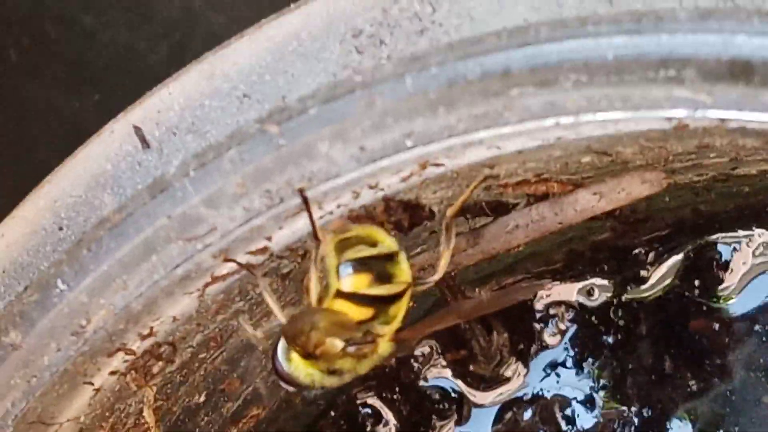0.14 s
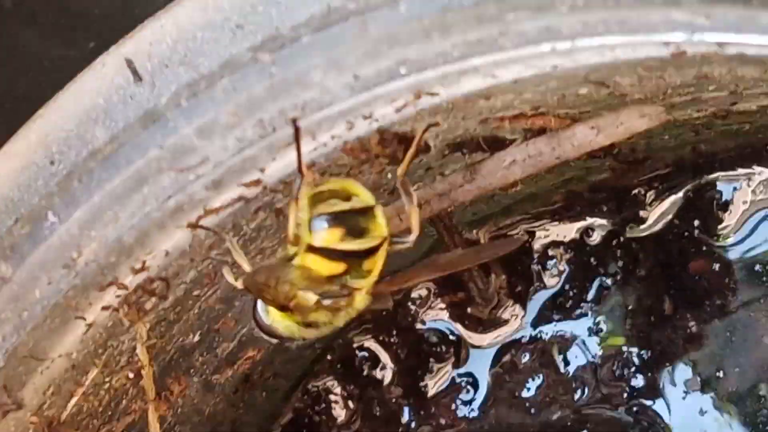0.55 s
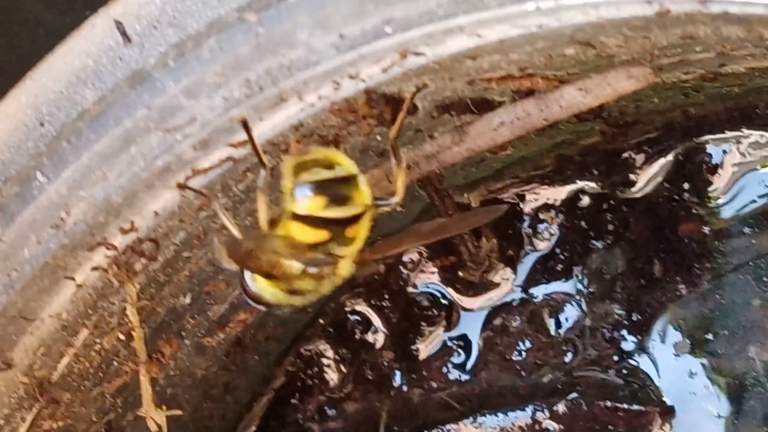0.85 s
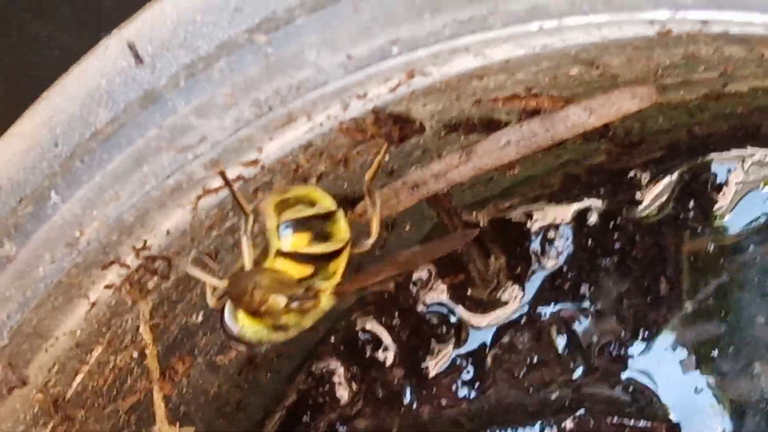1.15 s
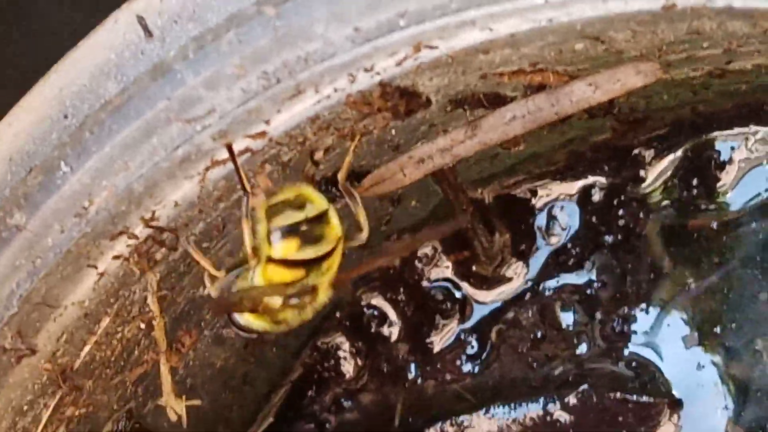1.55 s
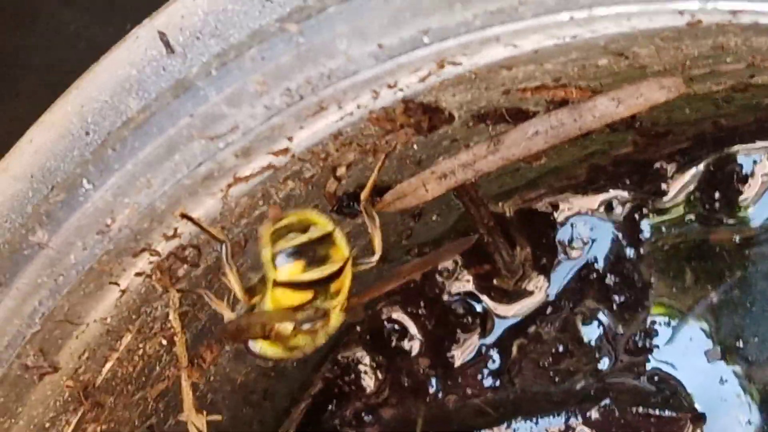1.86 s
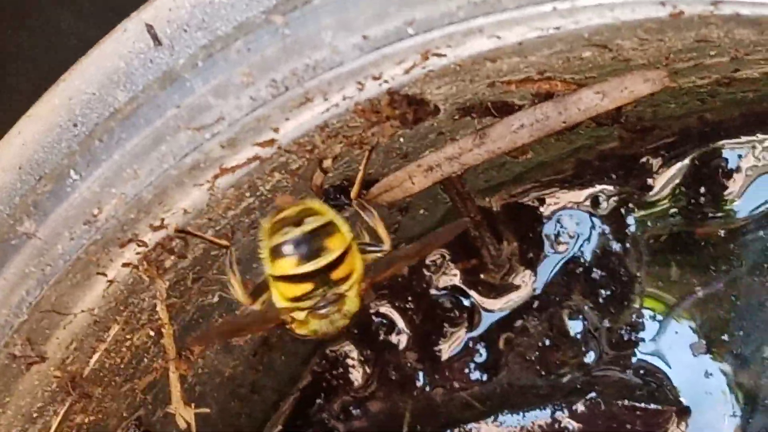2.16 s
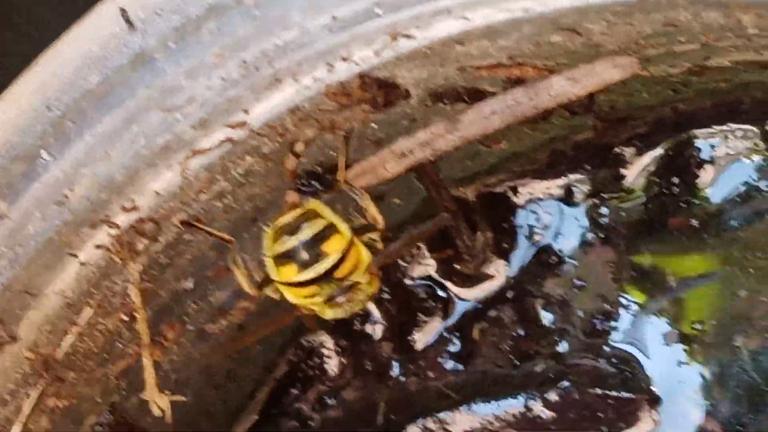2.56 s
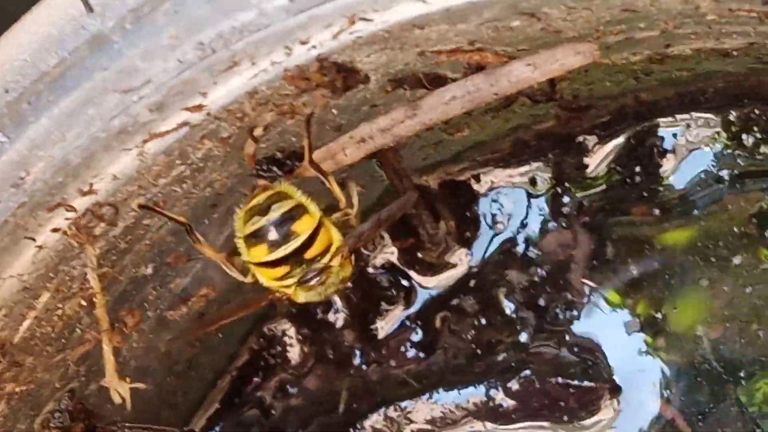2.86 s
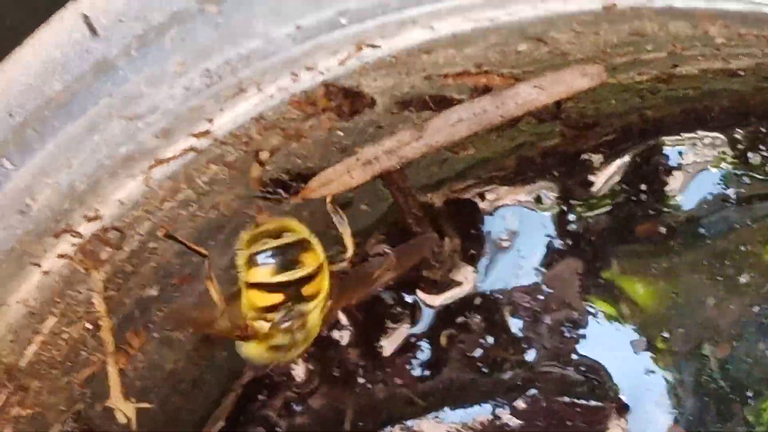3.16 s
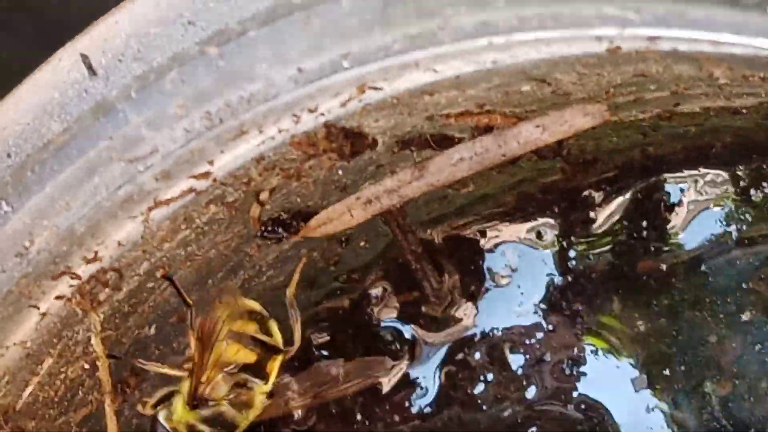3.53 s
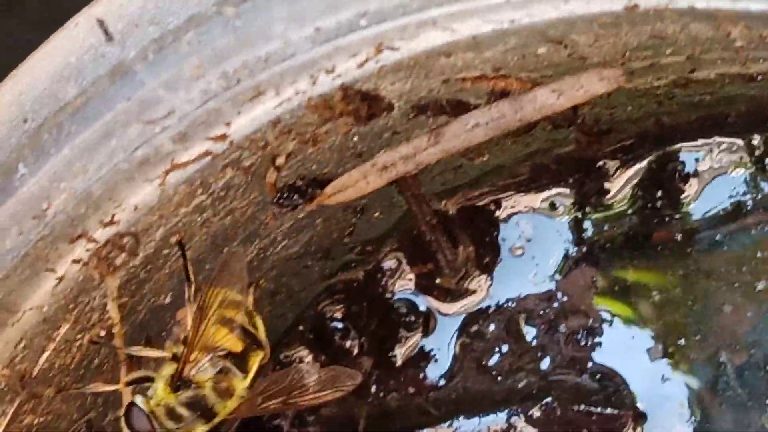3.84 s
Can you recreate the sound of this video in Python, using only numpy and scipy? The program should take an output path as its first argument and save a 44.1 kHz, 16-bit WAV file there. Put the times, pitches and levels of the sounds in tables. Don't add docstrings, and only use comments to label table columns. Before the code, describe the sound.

Electric tool some metres away kicks in late, its whine rising fast above faint traffic rumble

```python
import sys
import numpy as np
from scipy import signal
from scipy.fft import rfft, irfft, next_fast_len
from scipy.io import wavfile
from scipy.ndimage import uniform_filter1d

SR = 44100
rng = np.random.default_rng(int(sys.argv[2]) if len(sys.argv) > 2 else 0)


def to_linear_factor(level_db):
    exponent = np.asarray(level_db, float) / 20
    return 10 ** exponent


def bounce(signal):
    frames = np.transpose(np.atleast_2d(signal))
    limited = np.clip(frames, -1, 1)
    pcm = np.round(limited * 32767).astype(np.int16)
    wavfile.write(sys.argv[1], SR, pcm)


N = 176400

BARS, TOP_RATE_HZ = 24.8, 2810
START_S = 2.664
ALIKE_HZ = 350


def table(rows):
    return np.array(rows, float).T


def unit(x):
    return x / np.sqrt(np.mean(x ** 2))


def curve(points, hz):
    f, db = table(points)
    return np.interp(np.log(hz + 1), np.log(f), db)


def shape(x, gain):
    size = next_fast_len(N + 8192)
    f = np.arange(size // 2 + 1) * SR / size
    return irfft(rfft(x, size) * gain(f), size)[..., :N]


def ring(hz, centre_hz, width_hz):
    return 1j * hz * width_hz / (centre_hz ** 2 - hz ** 2 + 1j * hz * width_hz)


def ring_all(f, modes):
    return sum(to_linear_factor(db) * ring(f, hz, width) * (-1) ** k for k, (hz, width, db) in enumerate(modes))


def walk(rate):
    k = int(SR / rate)
    steps = np.repeat(rng.standard_normal(N // k + 1), k)
    return 1.21 * uniform_filter1d(uniform_filter1d(steps, k), k)[:N]


def wide(gain, alike_hz):
    f = np.arange(N // 2 + 1) * SR / N
    alike = 1 / (1 + (f / alike_hz) ** 2)
    re, im = rng.standard_normal((2, 2, len(f)))
    mid, side = irfft((re + 1j * im) * gain(f) * np.sqrt([1 + alike, 1 - alike]), N)
    return np.array([mid + side, mid - side])


def ringing_noise(hz, width_hz):
    return unit(wide(lambda f: ring(f, hz, width_hz) ** 2, ALIKE_HZ))


def bands(points, flicker_db, rate):
    out = 0
    for hz in 30 * 2. ** np.arange(10):
        def part(f):
            octaves_off = np.clip(np.log2((f + 1) / hz), -1, 1)
            return to_linear_factor(curve(points, f)) * np.cos(octaves_off * np.pi / 2)
        out = out + wide(part, ALIKE_HZ) * to_linear_factor(flicker_db * walk(rate))
    return unit(out)


def line_gain(f):
    # f/Hz, level/dB
    housing = [(740, 0), (830, -14), (960, -8), (1700, -11), (2750, -9), (3150, 0), (6700, 0), (7500, -12)]
    # f/Hz, width/Hz, level/dB
    lifts = [(188, 20, 16), (255, 60, 15), (345, 80, 9), (640, 190, 15), (950, 80, 7), (1900, 130, 16),
             (3300, 400, 4), (4720, 300, 7), (6150, 400, 6)]
    power = 1 + sum(np.abs(to_linear_factor(db) * ring(f, hz, width) ** 2) ** 2 for hz, width, db in lifts)
    return to_linear_factor(curve(housing, f)) * np.sqrt(power / (1 + (f / 7100) ** 24))


def motor_lines(rate, turn, on):
    # multiple of commutator rate, level/dB, growth with speed as a power
    whine = [(1, -61, 0), (2, -59, 0.5), (3, -59, 0.7), (4, -59, 1.4), (5, -57, 1.8), (6, -60, 2.2)]
    # multiple of shaft rate, level/dB at full speed, growth as a power
    shaft = [(1, -35, 3.8), (2, -49, 2.5), (3, -57, 1.0), (4, -54, 0.8), (5, -61, 0.8), (9, -50, 6),
             (18, -66, 3), (27, -54, 7)]
    scatter_rad, flicker_db = 1.0, 3.8
    rows = [(k * BARS, db, grow, scatter_rad) for k, db, grow in whine]
    rows += [(k, db, grow, scatter_rad * k / 60) for k, db, grow in shaft]
    out = 0
    for k, db, grow, scatter in rows:
        hz = k * rate / BARS
        port_sign = np.array([[1], [-1]])
        apart = port_sign * (1 - 1 / (1 + hz / ALIKE_HZ)) * (0.51 + 0.55 * walk(40))
        heard = line_gain(hz[::64]).repeat(64)[:N]
        size = to_linear_factor(db + flicker_db * min(k / 9, 1) * walk(45)) * heard
        size = size * (rate / TOP_RATE_HZ) ** grow
        uneven = scatter * (np.sin(turn + k) + .7 * walk(250))
        out = out - 1.27 * size * np.sin(k * turn + uneven + k + apart)
    return out * on


def casing(f):
    # f/Hz, width/Hz, level/dB
    casing_modes = [(72.8, 44, -8), (107.5, 19, 4.5), (184.4, 12, -1.5), (241.4, 21, 5.5),
                    (342.6, 32.4, 7.5), (410, 19, 5.5), (488, 62, -5), (621, 107, -5), (977, 107, -10),
                    (1398, 195, -12), (1933, 100, -17), (2157, 62, -19), (4800, 1200, -27.5)]
    return ring_all(f, casing_modes)


def rattle(t, noise, speed, turn, on):
    # t/s, level/dB
    effort_points = [
        (2.67, -7.5),
        (2.8, 6),
        (2.95, -0.5),
        (3.05, 3),
        (3.15, 4),
        (3.3, 5),
        (3.42, 6.5),
        (3.55, -1),
        (3.7, 0),
        (4, -0.5),
    ]
    effort = to_linear_factor(np.interp(t, *table(effort_points))) * on
    dull = shape(noise, lambda f: 1 / (1 + (f / 1530) ** 4))
    bright = (noise - dull) * speed
    shake = to_linear_factor(-40 + 2.0 * walk(30)) * speed ** 0.62 * (1 + .5 * np.sin(turn)) * effort
    return shape((dull + bright) * shake, casing)


def jolt(t, noise, on):
    # t/s, level/dB
    knock_times = [
        (2.672, 3),
        (2.684, 6),
        (2.6955, 4),
        (2.7065, 6),
        (2.719, 2),
        (2.731, -2),
        (2.759, -3),
    ]
    # f/Hz, width/Hz, level/dB
    jolt_modes = [(110, 40, -8), (250, 30, 5), (350, 32, 4), (490, 80, -8), (620, 60, -5), (950, 200, -24)]
    hold_s, fade_s = .045, 0.011
    fade = np.exp(-np.maximum(t - START_S - hold_s, 0) / fade_s)
    kick = on * to_linear_factor(-42 + 2 * walk(90)) * fade
    knocks = sum(to_linear_factor(db) * (np.arange(N) == int(s * SR)) for s, db in knock_times)
    return shape(noise * kick + knocks, lambda f: ring_all(f, jolt_modes) / (1 + 1j * f / 1500) ** 2)


def bracket(rate, on):
    torque = np.gradient(uniform_filter1d(rate, size=6000))
    torque = torque / torque.max() * on
    return ringing_noise(2215, 110) * to_linear_factor(-60.5 + 3.7 * walk(40)) * torque ** 2


def fan_air(t, speed, turn, on):
    # f/Hz, level/dB
    air_colour = [(180, -28), (300, -14), (348, -15), (798, -20), (958, -17.5), (3490, -28.5), (8840, -34),
                  (13200, -43), (15800, -40)]
    # t/s, level/dB
    flow = [
        (2.67, -4),
        (2.8, -3.5),
        (2.96, -2),
        (3.0, 2.5),
        (3.2, 4.5),
        (3.48, 3.5),
        (3.7, 1),
        (4, 0),
    ]
    level = to_linear_factor(-52 + np.interp(t, *table(flow))) * speed ** 1.02 * on
    return bands(air_colour, 1.3, 14) * level * (1 + 0.2 * np.sin(turn))


def tool(t):
    # t/s, commutator rate f/Hz
    spin = [(2.67, 100), (2.8, 250), (2.9, 385), (2.98, 545), (3.05, 670), (3.12, 815), (3.2, 1015),
            (3.28, 1270), (3.36, 1565), (3.5, 2020), (3.64, 2360), (3.76, 2555), (3.88, 2640), (4, 2700)]
    on = np.clip((t - START_S) / .006, 0, 1)
    rate = uniform_filter1d(np.interp(t, *table(spin)), size=3000)
    speed = rate / TOP_RATE_HZ
    turn = 2 * np.pi * np.cumsum(rate / BARS * (1 + .004 * walk(25))) / SR
    noise = rng.standard_normal(N)
    noise = noise / np.std(shape(noise, casing))
    body = rattle(t, noise, speed, turn, on) + jolt(t, noise, on)
    lines = motor_lines(rate, turn, on)
    straight = bracket(rate, on) + fan_air(t, speed, turn, on) + lines * 0.68
    return body + to_linear_factor(-9) * lines[0] / 2, straight


def walls(x):
    echo_s, echo_db = .11, -3
    lag = np.arange(int(.3 * SR)) / SR
    echo = rng.standard_normal((2, len(lag))) * to_linear_factor(-60 * lag / echo_s) * (lag > .002)
    echo = echo / np.sqrt(np.sum(echo ** 2, axis=1, keepdims=True))
    wet = signal.fftconvolve(x[None], echo)[:, :N]
    low = lambda f: 1 / (1 + 1j * f / 350)
    return shape(x, low) + to_linear_factor(echo_db) * shape(wet, lambda f: 1 - low(f))


def through_ports(machine, air):
    # f/Hz, level/dB
    port_colour = [(6000, 0.5), (8700, 3), (11000, 2.5), (13600, -11.5), (14400, -2), (15200, 12),
                   (16000, 6)]
    # f/Hz, level/dB
    port_pan = [(60, -3), (110, 3.5), (200, -5), (380, -1.5), (700, 2), (1290, -3.5), (2380, 1.5),
                (4400, -6), (8120, 5), (15000, 0)]
    # f/Hz, phase/radians
    port_lead = [(600, 0), (1000, -2.5), (2150, -7), (4000, -10.5)]
    side = np.array([[.5], [-.5]])
    lead = lambda f: np.exp(1j * side * curve(port_lead, f))
    ports = lambda f: to_linear_factor(curve(port_colour, f) + side * curve(port_pan, f))
    return shape(shape(machine, lead) + air, ports)


def creaks(t):
    creak_times = [.2, .595, .72, 1.26, 1.24, 1.32, 1.69, 2.228, 2.225, 2.57, .56, .74, 2.3, 2.48, 2.575,
                   .45, 1.245, .76, .7, 2.24, .44]
    # length/s, f/Hz, width/Hz, level/dB
    creak_sounds = [(0.056, 8800, 2200, -88.5), (0.03, 5900, 3000, -84.5), (0.63, 8600, 1300, -88.5),
                    (0.027, 5100, 2000, -83.5), (0.04, 15600, 540, -92), (0.048, 8500, 1300, -88),
                    (0.025, 2060, 1500, -77), (0.035, 9000, 2100, -84), (0.023, 6200, 690, -87),
                    (0.29, 8500, 840, -89.5), (0.24, 300, 165, -65.5), (0.14, 277, 150, -60),
                    (.06, 180, 120, -60), (0.2, 290, 180, -62), (0.068, 620, 510, -66),
                    (.05, 7000, 5000, -90), (.04, 8400, 690, -91), (.06, 8600, 1500, -88),
                    (0.52, 3900, 4000, -88.5), (.1, 2300, 1200, -82.5), (0.04, 610, 72, -67)]
    out = 0
    for s, (length, hz, width, db) in zip(creak_times, creak_sounds):
        swell = np.exp(-(2 * (t - s) / length) ** 2)
        out = out + to_linear_factor(db + 2.5 * walk(60)) * swell * ringing_noise(hz, width)
    return out


def yard(t):
    # f/Hz, level/dB
    wash_colour = [(15, -79), (25, -36), (79, -5), (123, -5.5), (350, -34), (1160, -27), (1350, -31),
                   (1510, -36), (5000, -67), (6500, -99), (11000, -120)]
    # f/Hz, level/dB
    hiss_colour = [(2940, -33), (4500, -8.5), (7400, -16), (9210, -10.5), (13900, -14), (15100, 2),
                   (15800, -5)]
    # f/Hz, width/Hz, level/dB
    engines = [(72.2, 19, -60.5), (108.3, 25.3, -58), (137.1, 10.9, -57), (300, 91, -74.5)]
    # t/s, level/dB
    swell_points = [(0, -1.5), (.15, 0.5), (.5, 0), (.85, -0.5), (1.25, 0), (1.7, -1.5), (2.2, -2),
                    (2.45, 0), (2.6, 2), (2.95, 2), (3.2, 6), (4, 7)]
    drones = sum(to_linear_factor(db + 4.35 * walk(9.01)) * ringing_noise(hz, width) for hz, width, db in engines)
    wash = to_linear_factor(-55) * bands(wash_colour, 1.6, 6.8)
    swell = to_linear_factor(np.interp(t, *table(swell_points)))
    top = lambda f: to_linear_factor(curve(hiss_colour, f)) * np.clip(f / 4000, 0, 1) ** 2
    return (drones + wash) * swell + to_linear_factor(-85.5) * unit(wide(top, 100))


def scene():
    t = np.arange(N) / SR
    machine, air = tool(t)
    return through_ports(walls(machine), air) + yard(t) + creaks(t)


def low_pass(x):
    return signal.sosfilt(signal.butter(12, 17100, fs=SR, output="sos"), x)


def record(dry):
    top_hz, open_s = 15780, .004
    dry = shape(dry, lambda f: f < top_hz) * np.clip(np.arange(N) / SR / open_s, 0, 1)
    bass_cut = signal.butter(1, 40, "high", fs=SR, output="sos")
    return low_pass(signal.sosfilt(bass_cut, dry))


dry = scene()
out = record(dry)
bounce(out)
```